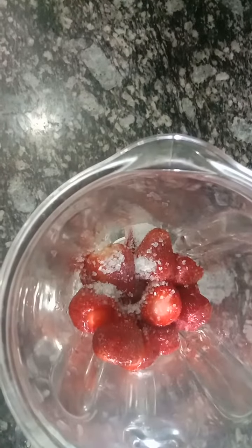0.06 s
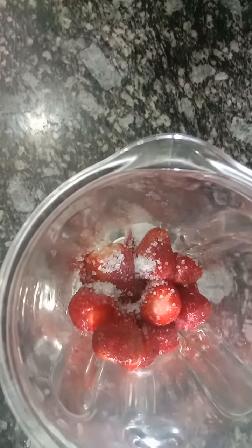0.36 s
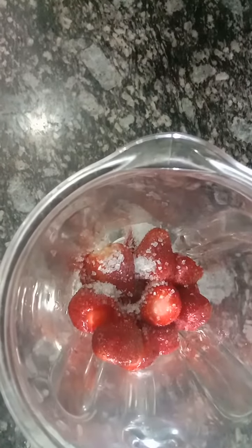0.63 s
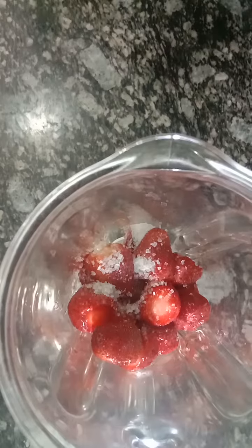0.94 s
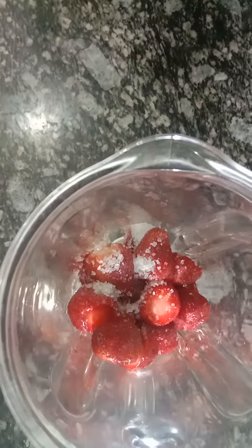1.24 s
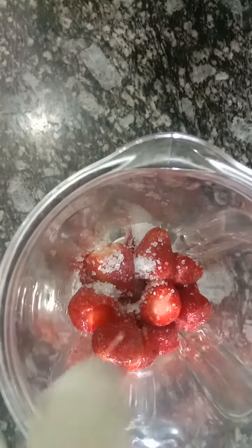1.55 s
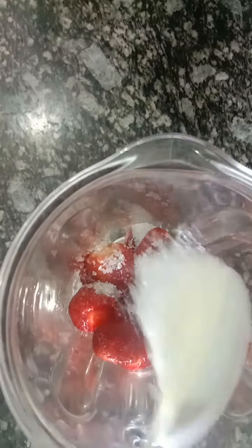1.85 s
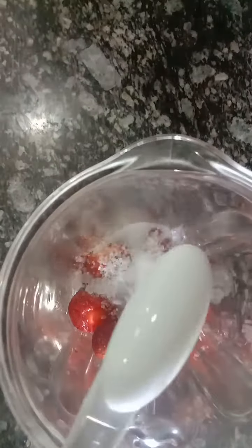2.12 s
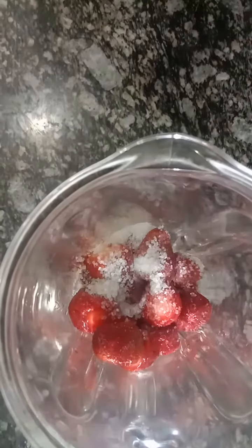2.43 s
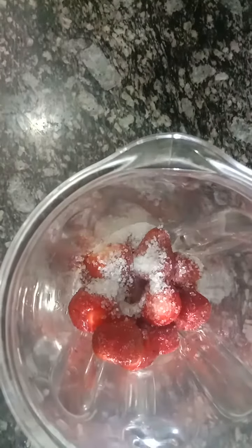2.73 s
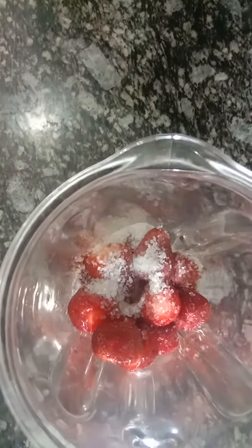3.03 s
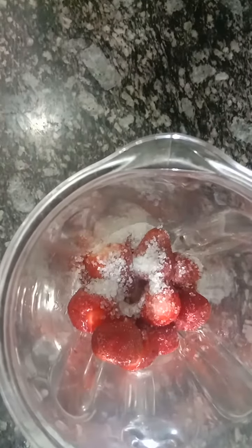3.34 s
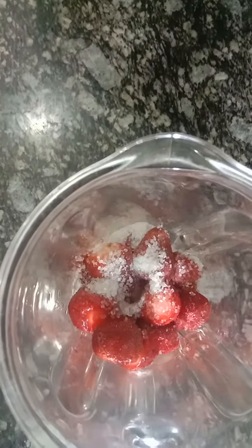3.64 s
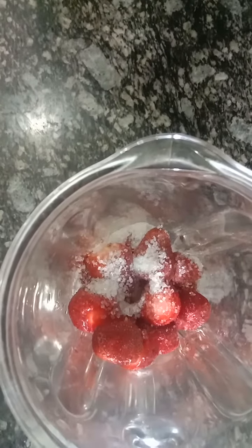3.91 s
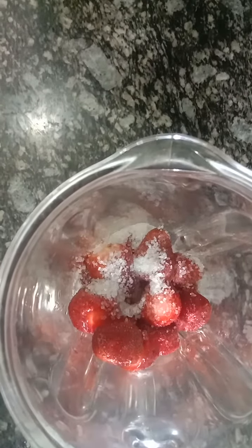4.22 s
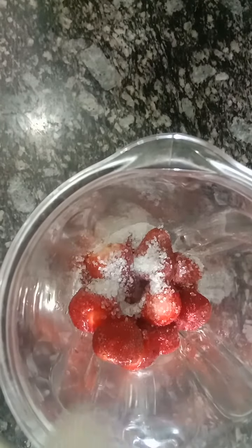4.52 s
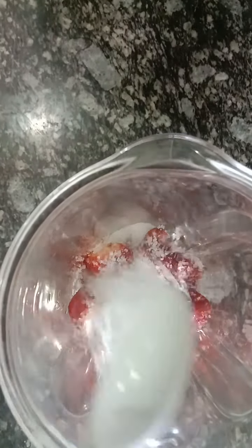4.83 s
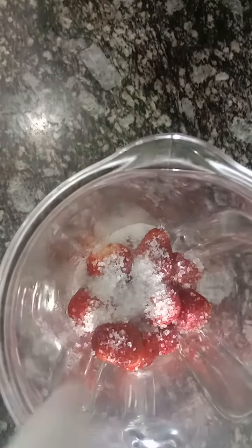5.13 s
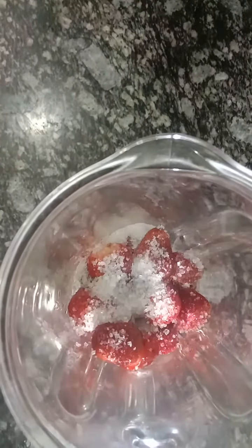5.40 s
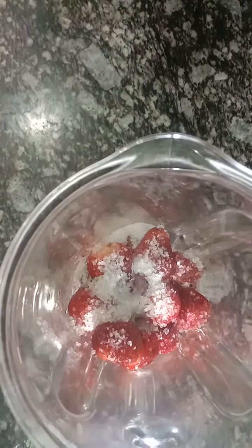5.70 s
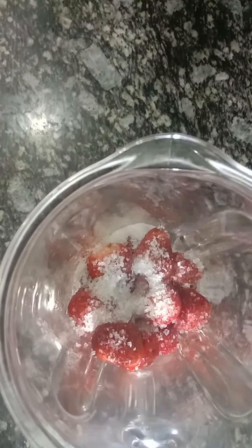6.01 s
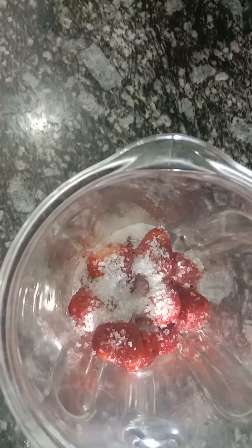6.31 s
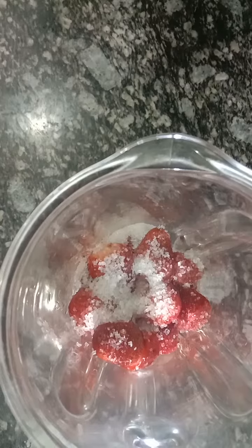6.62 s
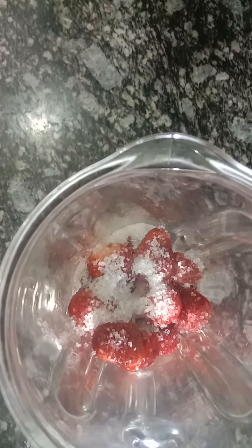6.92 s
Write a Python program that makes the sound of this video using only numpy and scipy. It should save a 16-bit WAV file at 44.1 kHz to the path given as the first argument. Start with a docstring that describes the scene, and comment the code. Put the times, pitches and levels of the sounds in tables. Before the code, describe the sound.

Sugar crunches round a spoon that clacks against a plastic tub, then showers gently onto fruit in a blender jar with small ringing taps. The scooping and pouring happen twice, with one loud knock and a scatter of crystals before the second pour. The lid is then pressed on with rasps and clicks, and the tub thuds onto the counter. Everything is close, in a small kitchen with a faint low rumble.

```python
"""A spoon knocks and crunches into a plastic tub of sugar, close to the microphone in a small kitchen.
Crystals slip round the spoon and drum on the tub wall, and loose grains tick on the plastic.
Two spoonfuls hiss onto strawberries in a blender jar, which rings where it is struck.
At the end the lid is worked onto the tub and the tub is set down on the stone counter.
The low noise of the house lies under it all."""
import sys
import numpy as np
from scipy import signal
from scipy.fft import rfft, irfft
from scipy.io import wavfile
from scipy.ndimage import uniform_filter1d

SR = 44100
rng = np.random.default_rng(int(sys.argv[2]) if len(sys.argv) > 2 else 0)


def master(y):
    """Save y as 16-bit WAV."""
    cut = np.clip(np.atleast_2d(y).T, -1, 1)
    pcm = np.round(cut * 32767)  # scale
    wavfile.write(sys.argv[1], SR, pcm.astype(np.int16))


N = 311213
TIME = np.arange(N) / SR

# modes of the plastic tub: pitch_hz, width_hz, level_db
TUB_MODES = [(489.5, 26, -0.5), (657, 130, -7), (730, 65, -2.5), (859, 72, -13), (1279, 120, -9.5),
             (1297, 58, -14.5), (1591, 66, -16), (1973, 48, -9.5), (2290, 130, -14.5), (2562, 100, -19),
             (2880, 30, -12), (3170, 25, -7.5), (5270, 260, -14), (5300, 190, -33), (6860, 170, -27)]
# modes of the jar and the air in it: pitch_hz, width_hz, level_db
JAR_MODES = [(487.5, 6, 1.5), (1260, 17, 4.5), (1734, 53, -20), (1880, 12, -17), (2060, 20, -8),
             (2820, 38, -1.5), (3188, 33, 3), (3720, 110, -3.5), (5160, 230, -1), (5620, 64, 4.5),
             (6920, 170, -0.5), (7330, 220, -14), (8900, 20, -10), (9060, 140, -8), (10120, 62, -4.5),
             (11220, 50, -7.5)]
# a hard contact on plastic, as the microphone colours it: frequency_hz, gain_db
CRACK_SPECTRUM = [(150, -29.5), (330, -37.5), (480, -11), (880, 8.5), (1100, -16.5), (1450, -7),
                  (2300, 0.5), (3300, 2), (4150, -4.5), (5400, -0.5), (7200, -6.5), (8200, -18),
                  (13500, -14.5), (15000, -8), (16000, -18)]


def undb(db):
    """Decibels to gain."""
    return 10 ** (np.asarray(db) / 20)


def unit(x):
    """Scale to rms 1."""
    return x / np.sqrt(np.mean(x ** 2))


def unit_hit(x):
    """Scale a hit so that its loudest 3 ms have rms 1."""
    return x / np.sqrt(uniform_filter1d(x ** 2, 132).max())


def add(track, start_s, sound):
    """Mix a sound into the track at a time."""
    start = int(start_s * SR)
    track[start:start + len(sound)] += sound[:N - start]


def through(x, response):
    """Convolve with an impulse response."""
    return signal.fftconvolve(x, response)[:len(x)]


def along(points, hz):
    """Read (frequency_hz, value) points on a log-frequency axis."""
    knots_hz, values = np.transpose(points)
    return np.interp(np.log(hz + 1e-9), np.log(knots_hz), values)


def colour(x, points, size=4096):
    """Causal filter through (frequency_hz, gain_db) points, built from the folded cepstrum."""
    gain = undb(along(points, np.fft.rfftfreq(size, 1 / SR)))
    cepstrum = irfft(np.log(gain))
    cepstrum[1:size // 2] *= 2
    cepstrum[size // 2 + 1:] = 0
    return through(x, irfft(np.exp(rfft(cepstrum))))


def ring(modes, seconds):
    """Impulse response of damped modes: the wider a mode, the sooner it dies."""
    t = TIME[:int(seconds * SR)]
    return sum(undb(db) * width * np.exp(-np.pi * width * t) * np.cos(2 * np.pi * hz * t)
               for hz, width, db in modes)


def burst(size, decay_s):
    """Noise that starts at once and dies away."""
    return rng.standard_normal(size) * np.exp(-TIME[:size] / decay_s)


def walk(per_s):
    """Random drift with rms 1."""
    knots = rng.standard_normal(4096)
    return unit(np.interp(TIME * per_s, np.arange(len(knots)), knots))


def grains(per_s, spread_db):
    """Random tiny impacts: many weak ones, a few strong."""
    hit = rng.random(N) < per_s / SR
    strength = undb(spread_db * np.minimum(rng.exponential(size=N), 5))
    return hit * strength * rng.choice([-1, 1], N)


def swells(moves, swell_db, attack_s, release_s, column=3):
    """Gain of hand movements: each catches, swells to the level in its column, eases off and lets go."""
    shape_db = [-60, -swell_db, 0, -swell_db, -60]
    power = 0
    for move in moves:
        start, rise, fall = move[:3]
        corners_s = start + np.cumsum([-attack_s, attack_s, rise, fall, release_s])
        db = np.interp(TIME, corners_s, shape_db, left=-200, right=-200)
        power += undb(move[column] + db) ** 2
    return np.sqrt(power)


def drummed(push, modes, shift_db):
    """Modes driven by a moving contact: each comes and goes as the spot shifts."""
    return unit(sum(through(push, ring([mode], .15)) * undb(shift_db * walk(11)) for mode in modes))


def enclosed(x):
    """Sound bounces about inside a vessel for a few ms, which gives it many fine resonances."""
    bounces = colour(burst(2048, decay_s=.006), [(700, -24), (2000, 0)])
    return unit(x + .75 * through(x, bounces / np.sqrt(np.sum(bounces ** 2))))


def room_tone():
    """The low noise of the house, which also sounds in the open jar, and a rumble that comes and goes."""
    # house noise in the kitchen: frequency_hz, gain_db
    air_spectrum = [(20, -36.5), (40, -18), (65, 2.5), (120, -3.5), (190, -20.5), (260, -10.5), (480, -8.5),
                    (720, -19.5), (1500, -20.5), (3400, -27.5), (4300, -33), (5500, -35.5), (7200, -31.5),
                    (8100, -55), (13500, -42), (15000, -42.5), (16000, -43)]
    # course of the low rumble: time_s, level_db
    rumble_levels = [(0.0, -74), (0.47, -58.5), (1.28, -70), (2.0, -71), (2.06, -55.5), (2.26, -73),
                     (2.34, -61), (2.75, -72), (2.87, -58), (4.13, -65), (4.46, -74.5), (5.11, -58),
                     (5.52, -67.5), (5.86, -57), (6.23, -67), (6.31, -55), (6.72, -58), (7.06, -67)]
    hollow_spectrum = [(500, -2.5), (1300, -5), (1700, -20), (3500, -13.5), (5500, -24.5), (9000, -48.5)]
    rumble_spectrum = [(25, -30.5), (70, -2), (115, -7.5), (165, -.5), (250, -24.5), (600, -32.5),
                       (3000, -79)]
    air = undb(-70 + 2.5 * walk(5)) * unit(colour(rng.standard_normal(N), air_spectrum))
    jar_air = through(rng.standard_normal(N), ring(JAR_MODES, .25))
    hollow = unit(colour(jar_air, hollow_spectrum))
    rumble = unit(colour(rng.standard_normal(N), rumble_spectrum))
    rumble *= undb(np.interp(TIME, *np.transpose(rumble_levels)))
    return air + undb(-77 + 2 * walk(4.9)) * hollow + rumble


def kitchen_walls(x):
    """Hard kitchen walls return a diffuse tail that dies sooner in the treble."""
    # reverberation of the kitchen: frequency_hz, t60_s
    decays = [(150, 0.94), (500, 0.47), (1500, .48), (3000, 0.46), (6000, 0.41), (10000, 0.29),
              (16000, 0.31)]
    bands_hz, t60s = np.transpose(decays)
    t, hz = TIME[:SR], np.arange(SR // 2 + 1)
    noise = rfft(rng.standard_normal(SR))
    tail = 0
    for band, t60 in zip(np.eye(len(decays)), t60s):
        share = along(list(zip(bands_hz, band)), hz)
        tail += irfft(noise * share, SR) * undb(-60 * t / t60)
    tail *= 1 - np.exp(-t / .006)
    return through(x, tail / np.sqrt(np.sum(tail ** 2)))


def pouring():
    """Sugar whispers off the spoon and showers softly on the fruit; grains that hit the jar ring it."""
    # sugar sliding along the tilted spoon: start_s, rise_s, fall_s, level_db
    slides = [(1.83, 0.026, 0.083, -71), (4.57, 0.16, 0.11, -67.5)]
    # spoonfuls falling into the jar: start_s, rise_s, fall_s, relative_db
    pours = [(1.917, 0.18, 0.094, -51.5), (4.793, 0.15, 0.26, -56.5)]
    # spoon and last lumps tapping the jar: start_s, level_db, hardness_hz
    jar_taps = [(2.153, -50.5, 477), (2.293, -48.5, 12000), (2.389, -54.5, 11800), (4.931, -42.5, 810),
                (5.2135, -49.5, 12400), (5.2883, -47, 10000), (5.405, -56.5, 12280), (5.526, -56.5, 11060)]
    # sugar landing in the jar, as the microphone colours it: frequency_hz, gain_db
    hiss_spectrum = [(300, 0), (1100, 8), (1700, 14.5), (4200, 8.5), (5600, 20), (7100, -6), (8100, -56),
                     (11000, 13.5), (13500, -39), (15000, 7.5), (16000, 20)]
    slide_spectrum = [(2500, -59), (5000, -44), (7000, -33), (8500, -53), (14000, -51)]
    whisper = unit(colour(grains(per_s=4700, spread_db=4.5), slide_spectrum))
    whisper *= swells(slides, swell_db=12, attack_s=.08, release_s=.08)
    shower = grains(per_s=4000, spread_db=3.4) * undb(1.5 * walk(70))
    hiss = undb(8.5) * enclosed(colour(shower, hiss_spectrum))
    # single grains are too light to move the two lowest modes
    singing = undb(-1) * drummed(shower, JAR_MODES[2:], shift_db=4.5)
    landing = (hiss + singing) * swells(pours, swell_db=15, attack_s=.027, release_s=1)
    jar = unit_hit(ring(JAR_MODES, .4))
    taps = np.zeros(N)
    for start_s, level_db, hardness_hz in jar_taps:
        click = unit_hit(colour(burst(len(jar), decay_s=.01), hiss_spectrum))
        contact = signal.butter(2, hardness_hz, fs=SR)
        add(taps, start_s, undb(level_db) * unit_hit(signal.lfilter(*contact, jar + click)))
    return whisper + landing + taps


def spilling():
    """Loose sugar trickles off the spoon, a few crystals skitter about, and strays land one by one."""
    # sugar falling off the heaped spoon into the tub: start_s, rise_s, fall_s, relative_db
    spills = [(.84, 0.062, 0.071, -67), (3.75, .14, 0.06, -41), (4.0, 0.036, 0.032, -43.5)]
    # crystals skittering as the tub is handled: start_s, rise_s, fall_s, relative_db
    skitters = [(.85, 0.16, 0.081, -61.5), (3.76, 0.1295, 0.22, -54), (5.2, .42, .48, -79.5)]
    # the loudest single crystals landing: start_s, level_db
    strays = [(0.9587, -35.5), (1.0083, -42.5), (1.175, -54), (3.601, -42.5), (3.82, -36), (3.888, -24),
              (3.9888, -38), (4.0264, -33.5), (4.154, -44.5), (4.2122, -55), (4.433, -64.5), (5.64, -46),
              (6.042, -51.5)]
    # a crystal on plastic, as the microphone colours it: frequency_hz, gain_db
    tick_spectrum = [(400, -33.5), (2400, -11.5), (3000, -5), (3500, -14), (4600, -14.5), (7000, -3.5),
                     (8200, -8), (10000, 3), (13500, -5.5), (15000, 4.5), (16000, -9)]
    trickle = unit(colour(grains(per_s=730, spread_db=1), tick_spectrum))
    trickle *= swells(spills, swell_db=16, attack_s=.03, release_s=.41)
    skitter = unit(colour(grains(per_s=70, spread_db=2.5), tick_spectrum))
    skitter *= swells(skitters, swell_db=7, attack_s=.03, release_s=.2)
    ticks, t = np.zeros(N), TIME[:2048]
    for start_s, level_db in strays:
        snap = rng.standard_normal(len(t)) * (np.exp(-t / .0007) + .1 * np.exp(-t / .005))
        add(ticks, start_s, undb(level_db) * unit_hit(colour(snap, tick_spectrum)))
    return undb(.5) * trickle + undb(-1.5) * skitter + ticks


def closing_lid():
    """The lid sticks and slips along the rim; pressed down, the tub rings in only a few modes."""
    # the lid rubbing on the rim: start_s, rise_s, fall_s, rasp_relative_db, drum_db
    rubs = [(5.61, 0.013, 0.098, -47.5, -59), (5.76, 0.051, 0.031, -53, -81),
            (5.85, 0.014, 0.27, -66, -57.5), (6.197, 0.013, 0.012, -41, -36),
            (6.244, 0.021, 0.074, -38, -31.5), (6.32, 0.022, 0.0077, -50, -32),
            (6.367, 0.013, 0.016, -43, -30.5)]
    pressed_modes = [(479, 34, 0), (700, 42, 0), (1290, 50, -4)]
    slips = grains(per_s=3500, spread_db=2.2) * undb(.9 * walk(120))
    rasp = unit(colour(slips + grains(per_s=250, spread_db=3.2), CRACK_SPECTRUM))
    drum = unit(through(slips, ring(pressed_modes, .15)))
    rasp_gain, drum_gain = (
        swells(rubs, swell_db=11, attack_s=.045, release_s=.068, column=c) for c in (3, 4))
    return undb(-3.5) * rasp * rasp_gain + drum * drum_gain


def counter_thuds():
    """Blows pass through the tub and ring the low modes of the stone counter."""
    # modes of the counter: pitch_hz, width_hz, level_db
    counter_modes = [(150, 4.7, 24.5), (233.4, 100, 3), (316, 27, 2), (459, 34, 9.5)]
    # blows that reach the counter: start_s, level_db
    blows = [(6.346, -40), (6.6, -29)]
    thud_spectrum = [(40, -9), (140, 2.5), (500, 21.5), (2000, -62), (8000, -72)]
    thud = unit_hit(colour(ring(counter_modes, 1), thud_spectrum))
    thuds = np.zeros(N)
    for start_s, level_db in blows:
        add(thuds, start_s, undb(level_db) * thud)
    return thuds


def knocking():
    """Each blow cracks and rings the tub; the spot chooses the modes, a soft contact dulls the treble."""
    # blows on the tub: start_s, level_db, hardness_hz, spot_pitch_hz
    blows = [(.009, -29.5, 6000, 800), (.043, -35, 7000, 1530), (0.0822, -21, 4630, 1380),
             (.094, -26, 6500, 780), (0.5063, -40.5, 9100, 1450), (.671, -32, 12000, 3120),
             (0.769, -34, 2000, 880), (.795, -33.5, 2200, 1400), (1.547, -34, 4860, 680),
             (1.5854, -32.5, 3400, 1890), (1.652, -31, 4300, 850), (1.671, -39, 3040, 610),
             (2.7765, -33.5, 4500, 556), (3.039, -36.5, 2020, 890), (3.268, -27.5, 6440, 860),
             (3.3172, -28, 7000, 600), (3.325, -28, 2500, 900), (3.7197, -11.5, 4400, 570),
             (3.7255, -13.5, 800, 600), (3.769, -30, 5600, 2480), (5.618, -32.5, 6037, 1240),
             (5.848, -33.5, 1500, 910), (5.865, -43.5, 7000, 1290), (6.203, -34.5, 1170, 710),
             (6.226, -33.5, 800, 694), (6.244, -27.5, 6000, 716), (6.258, -25, 3000, 1260),
             (6.267, -29.5, 2500, 1300), (6.287, -26, 3500, 1400), (6.341, -22.5, 6160, 500),
             (6.369, -23, 8000, 755), (6.506, -44, 4000, 1292), (6.599, -26.5, 750, 717),
             (6.6047, -23.5, 700, 715)]
    body_spectrum = [(150, -9.5), (340, -12.5), (470, 4.5), (880, -2), (1080, -6.5), (1280, 4)]
    spot_db, spot_octaves = 18, .3
    crack_db_per_octave, even_hz = 8, 4560  # crack and ring are level at this hardness
    knocks = np.zeros(N)
    for start_s, level_db, hardness_hz, spot_hz in blows:
        modes = [(hz, width, db + spot_db * np.exp(-(np.log2(hz / spot_hz) / spot_octaves) ** 2))
                 for hz, width, db in TUB_MODES]
        # the sugar damps the wall quickly; a weaker part of each mode rings on
        lingering = [(hz, .11 * width, db - 3) for hz, width, db in modes]
        body = unit_hit(colour(ring(modes + lingering, .4), body_spectrum))
        crack = unit_hit(colour(burst(len(body), decay_s=.0041), CRACK_SPECTRUM))
        crack *= undb(crack_db_per_octave * np.log2(hardness_hz / even_hz))
        contact = signal.butter(2, min(2 * hardness_hz, SR / 2.3), fs=SR)
        add(knocks, start_s, undb(level_db) * unit_hit(signal.lfilter(*contact, body + crack)))
    return knocks


def scooping():
    """Crystals slip past the spoon in small avalanches; pressed to the tub wall they rasp and drum."""
    # spoon strokes: start_s, rise_s, fall_s, crunch_db, rasp_relative_db, drum_relative_db
    strokes = [(.003, 0.0037, 0.087, -45, -27.5, -43), (.11, 0.096, 0.041, -49, -40, -48.5),
               (.325, 0.071, 0.055, -37, -43, -49.5), (.45, 0.028, 0.33, -51, -55, -55.5),
               (.63, 0.011, 0.1, -37.5, -45, -64), (.725, 0.058, 0.028, -44.5, -40, -41),
               (1.587, 0.06, 0.0081, -47, -40, -45), (2.777, 0.022, .042, -49, -40, -44.5),
               (2.885, .04, 0.086, -30, -39, -39), (2.99, .05, 0.11, -42, -42.5, -47.5),
               (3.11, .115, .09, -38, -32.5, -37.5), (3.34, 0.14, 0.056, -50.5, -52.5, -55.5),
               (3.52, 0.084, 0.064, -56, -64.5, -63)]
    # crystals crunching round the spoon, as the microphone colours it: frequency_hz, gain_db
    crunch_spectrum = [(200, -26.5), (450, -9.5), (880, -20.5), (1100, -22.5), (1400, -4), (2400, -7.5),
                       (3400, -4.5), (4300, -4.5), (5500, -1.5), (7100, 1), (8100, -15.5), (10000, -7),
                       (13600, -14.5), (15000, -2.5), (16000, -16)]
    scrape_spectrum = [(1000, -19), (1500, 0), (2100, -3), (3600, -2.5), (4400, -6), (9000, -28.5)]
    avalanches = undb(1.6 * walk(110))
    crunch = enclosed(colour(grains(per_s=9000, spread_db=2.5) * avalanches, crunch_spectrum))
    push = grains(per_s=3500, spread_db=.5) * avalanches
    # the wall rasps in its high modes and drums in its low ones
    rasp = drummed(push, TUB_MODES[4:], shift_db=5.5)
    rasp += undb(-3.5) * enclosed(colour(push, scrape_spectrum))
    drum = undb(-2.5) * drummed(push, TUB_MODES[1:4], shift_db=4.5)
    drum += undb(-4.5) * drummed(push, TUB_MODES[3:4], shift_db=2)
    # the lowest mode grows as the tub empties
    emptied = undb(np.interp(TIME, [1.7, 2.8], [-11, -2]))
    drum += emptied * drummed(push, TUB_MODES[:1], shift_db=-6.5)
    drum = colour(drum, [(150, -17.5), (330, 3), (460, 0)])
    crunch_gain, rasp_gain, drum_gain = (
        swells(strokes, swell_db=11, attack_s=.025, release_s=.04, column=c) for c in (3, 4, 5))
    return crunch * crunch_gain + undb(-5.5) * rasp * rasp_gain + undb(-2) * drum * drum_gain


def scene():
    """Tub and jar stand on the counter close to one microphone, with the kitchen round them."""
    close = scooping() + spilling() + closing_lid() + knocking() + counter_thuds() + pouring()
    return (close + undb(-12) * kitchen_walls(close) + room_tone())[None]


def record(dry, top_hz=15750):
    """The phone that serves as microphone cuts the highest treble."""
    return signal.sosfilt(signal.ellip(8, .2, 70, top_hz, fs=SR, output="sos"), dry)


dry = scene()
out = record(dry)
master(out)
```